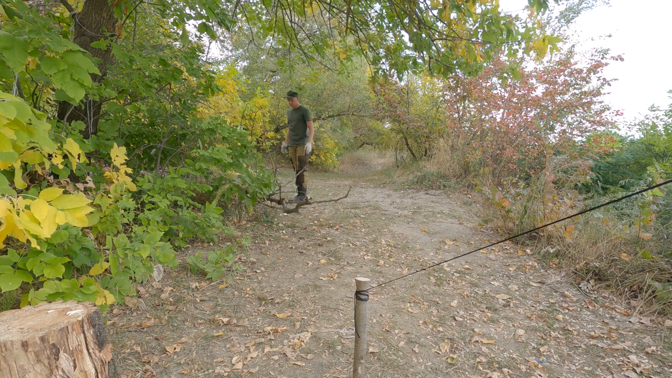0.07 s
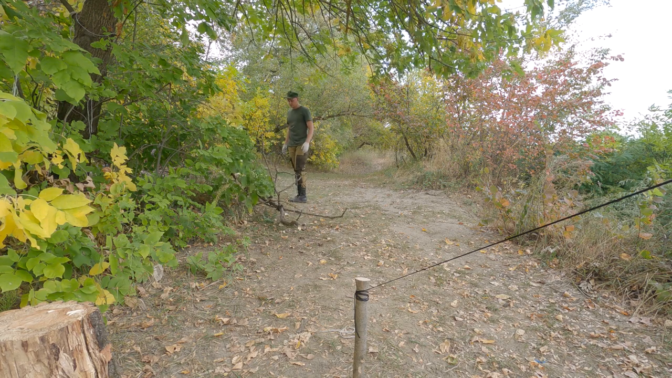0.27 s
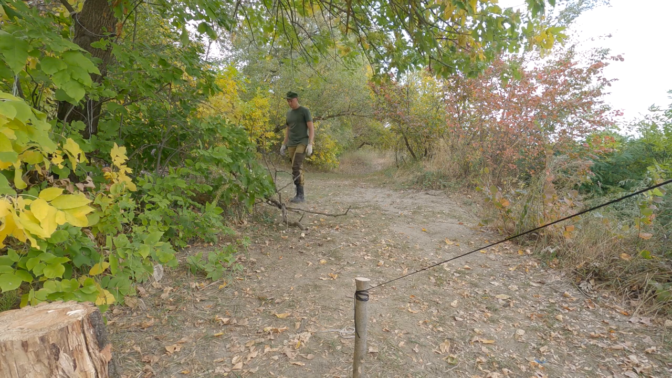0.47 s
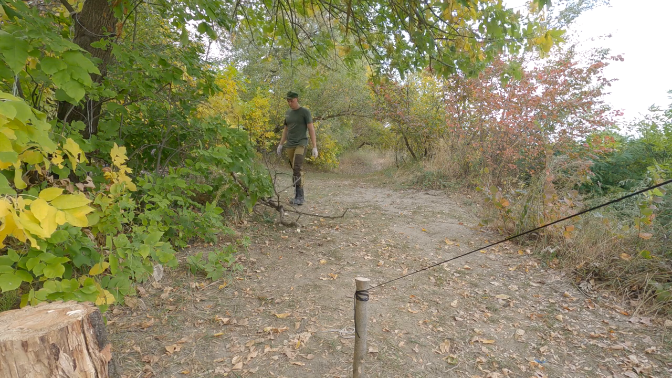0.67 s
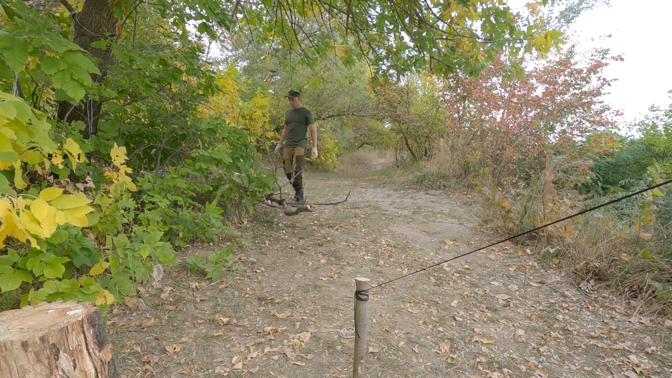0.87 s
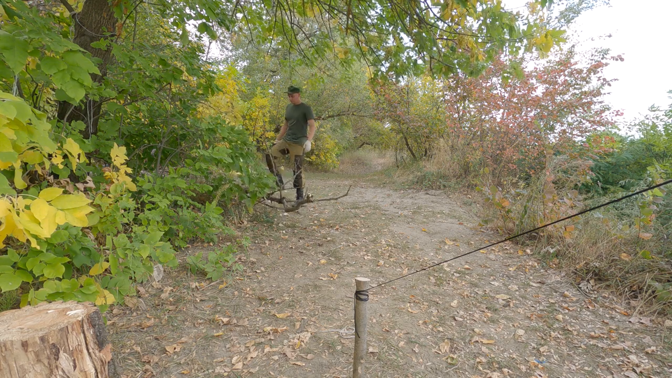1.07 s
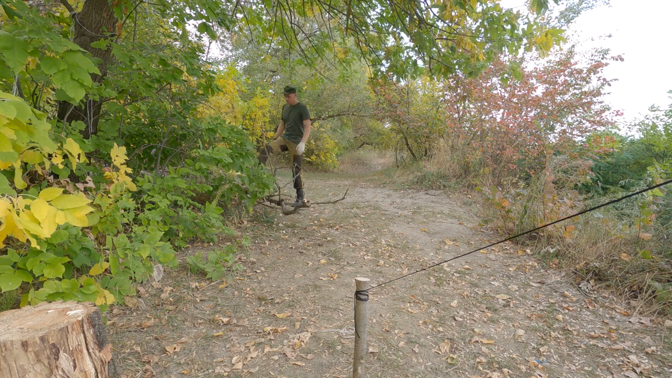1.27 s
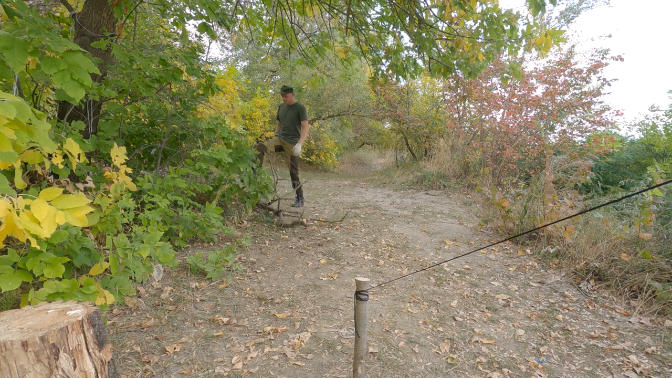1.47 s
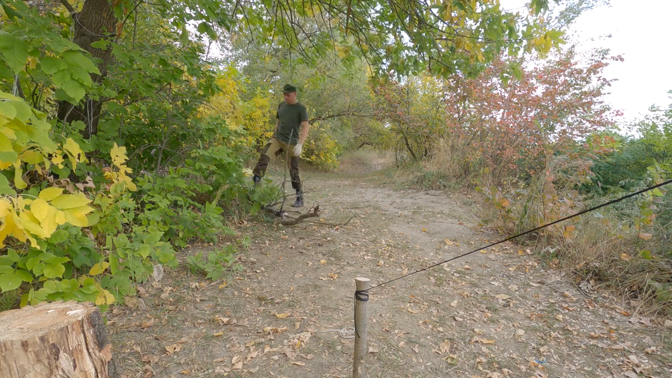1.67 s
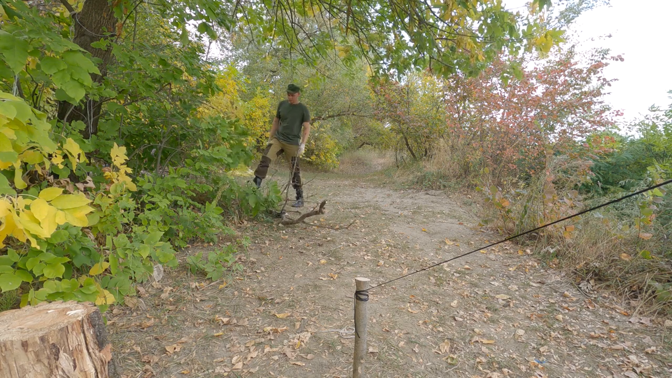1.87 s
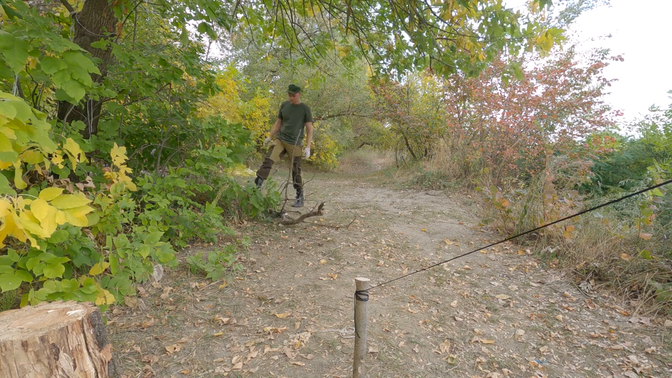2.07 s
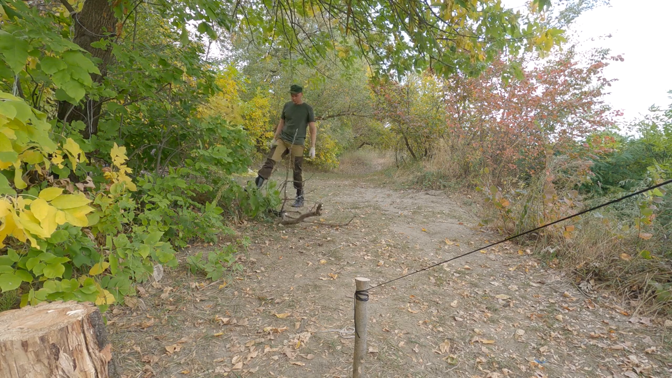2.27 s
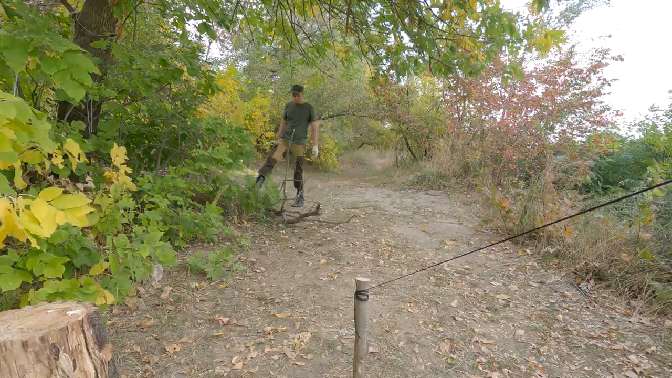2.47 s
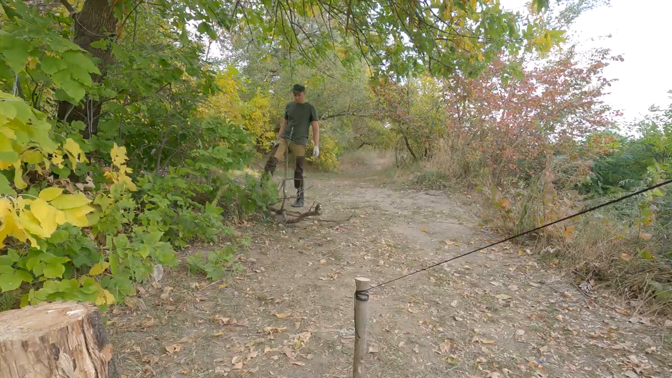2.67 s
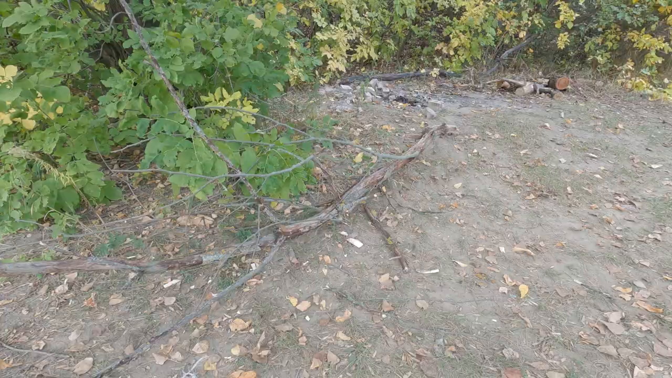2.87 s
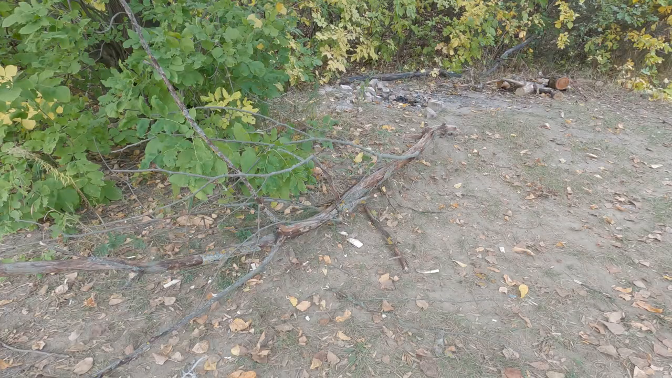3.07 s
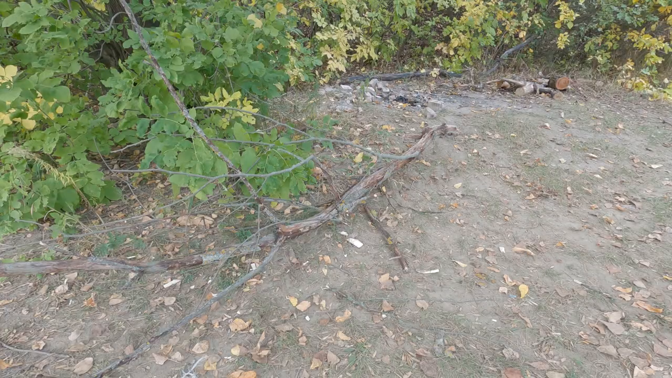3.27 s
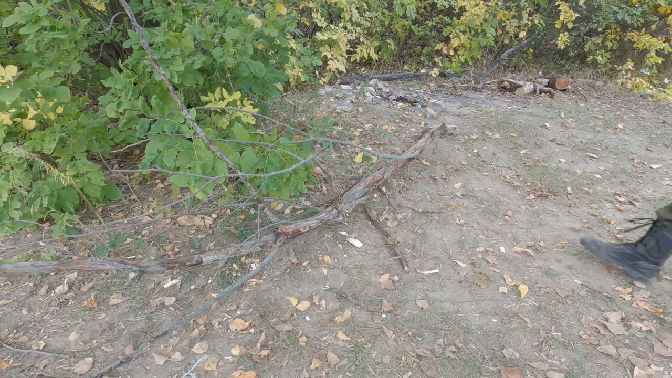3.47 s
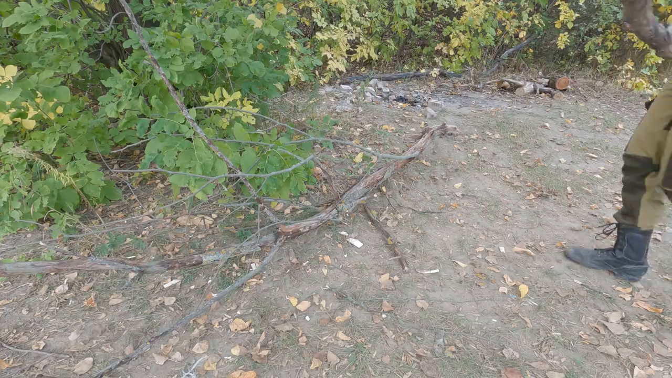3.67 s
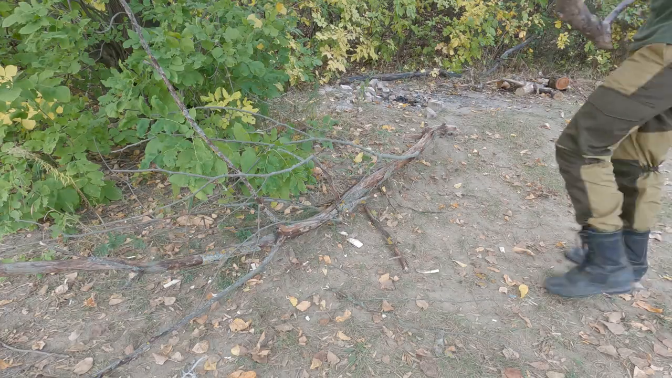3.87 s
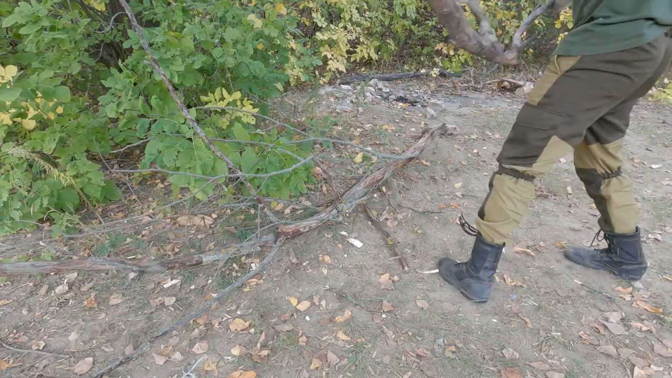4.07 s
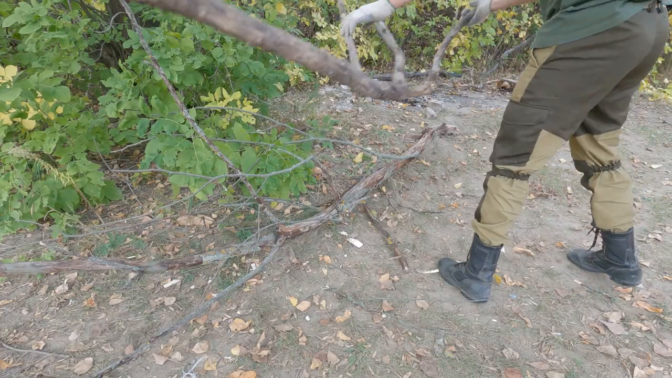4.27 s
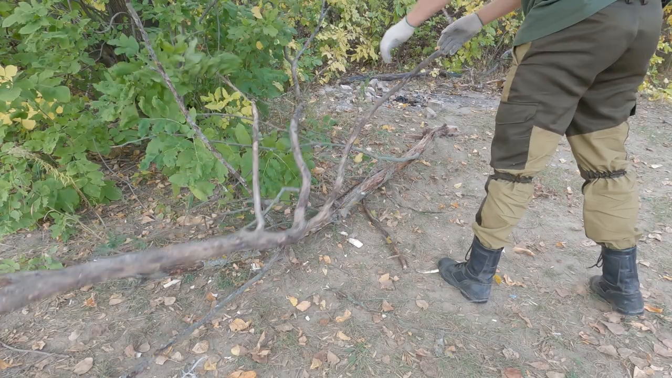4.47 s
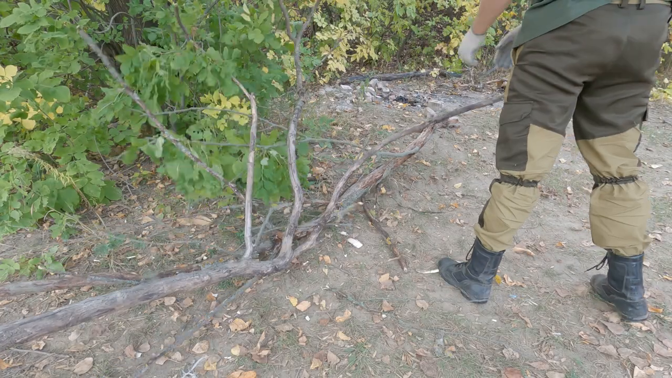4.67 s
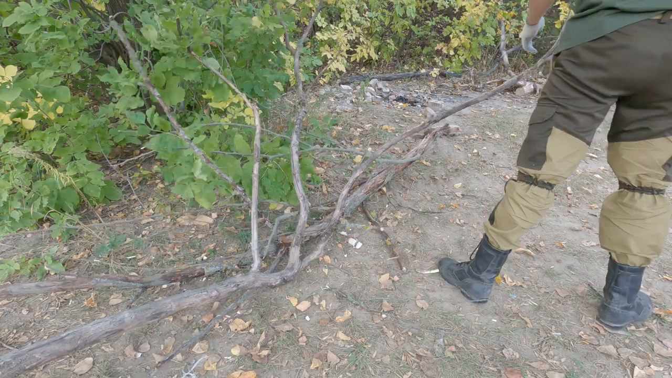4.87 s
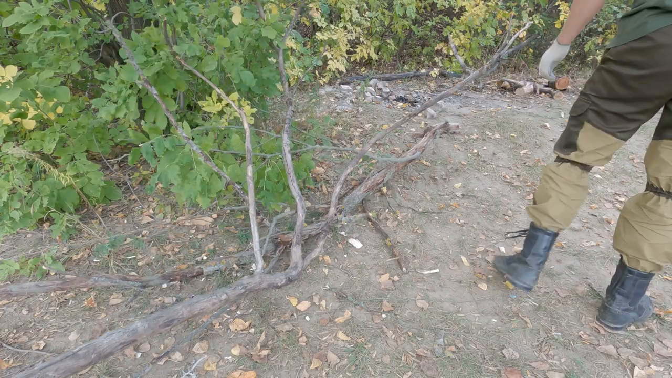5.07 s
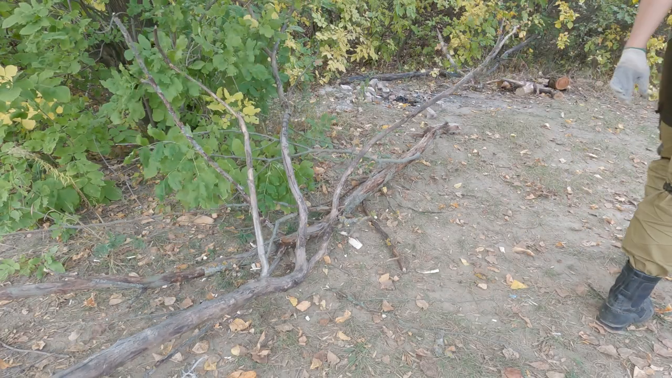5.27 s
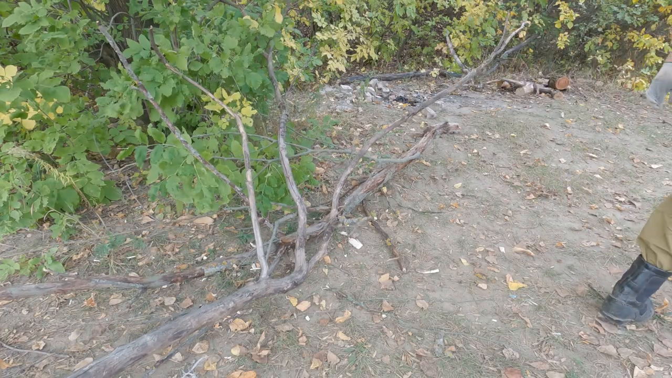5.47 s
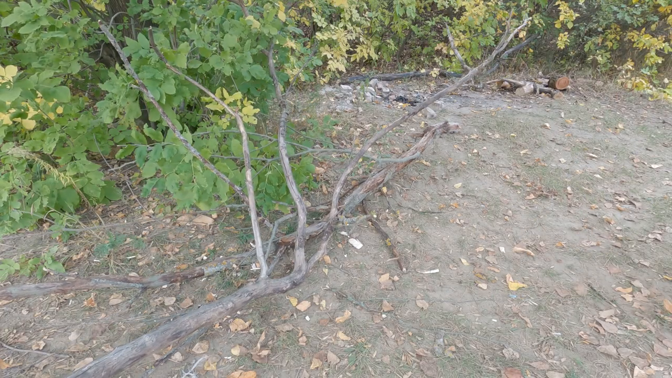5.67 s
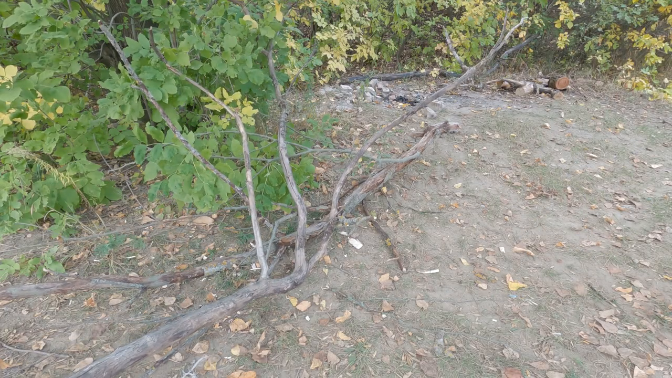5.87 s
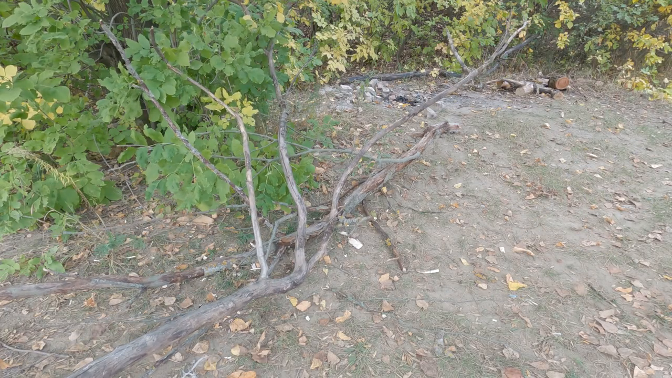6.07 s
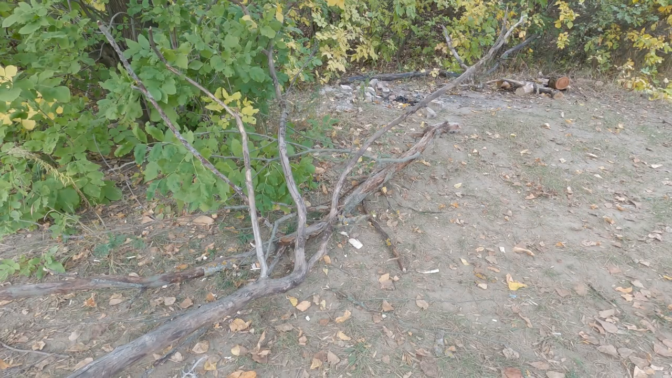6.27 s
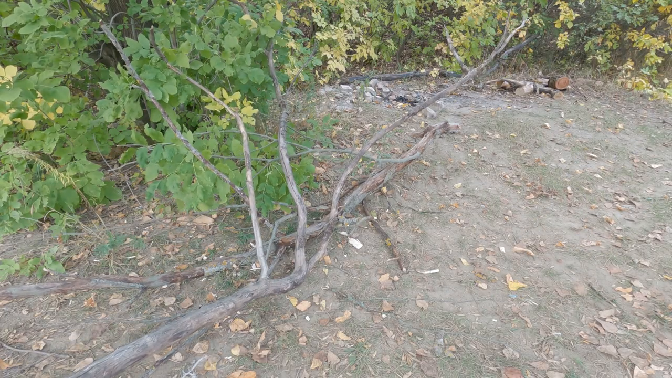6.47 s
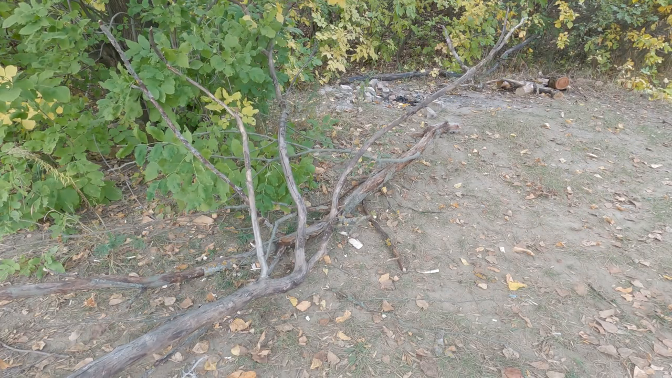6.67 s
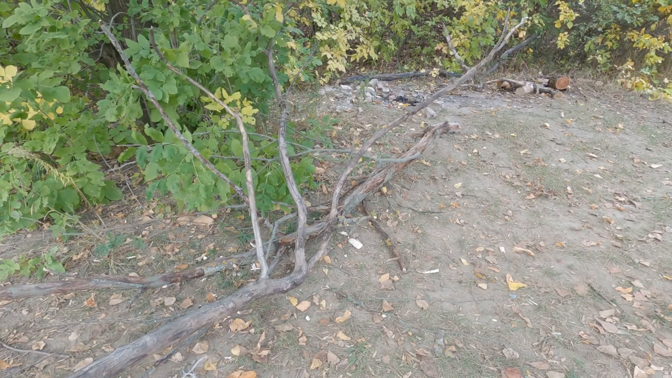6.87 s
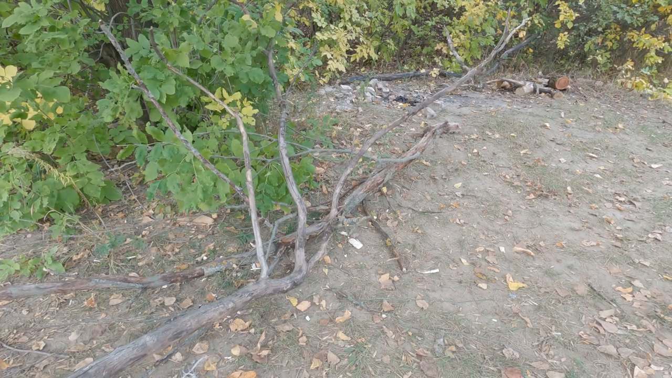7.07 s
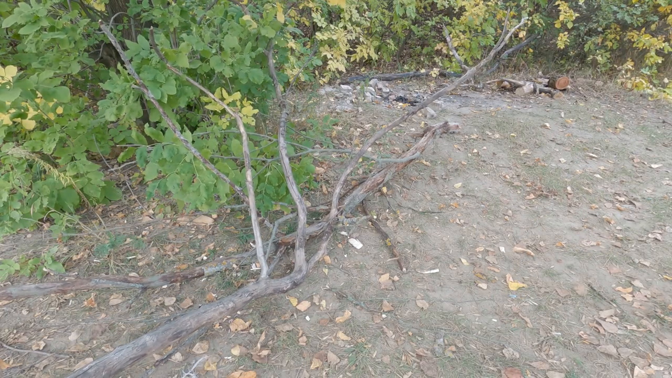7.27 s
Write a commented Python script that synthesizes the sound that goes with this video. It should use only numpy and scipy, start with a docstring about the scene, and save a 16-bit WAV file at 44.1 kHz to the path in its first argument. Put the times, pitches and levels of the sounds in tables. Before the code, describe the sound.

A dead branch is dragged through dry leaves, tears free with sharp snaps, then after footsteps is thrown down with a clattering crash.

```python
"""Dead branch dragged and thrown

In undergrowth a dead branch is dragged over fallen leaves: crackling, coloured noise swelling with the pull,
over dull limb drumming. Twigs snap as noise bursts, boughs knock as ringing modes, heels thud as damped pushes.
Soles crunch grit; the branch is thrown down with a crash and the leaves settle.
All sources are straight ahead of the microphone; the trees answer faintly, as a short scattered noise tail.
A distant rumble, a hush and fluttering insect tones lie underneath.
"""
import sys
import numpy as np
from scipy import signal
from scipy.fft import rfft, irfft, next_fast_len
from scipy.io import wavfile
from scipy.ndimage import uniform_filter1d, map_coordinates

SR = 44100
rng = np.random.default_rng(int(sys.argv[2]) if len(sys.argv) > 2 else 0)


def wav_out(sig):
    """Save sig, one row per channel (or a flat mono array), as 16-bit PCM at SR to the path in sys.argv[1]."""
    wavfile.write(sys.argv[1], SR, np.round(np.clip(np.atleast_2d(sig).T, -1, 1) * 32767).astype(np.int16))


N = 321930  # samples
TOP_HZ = 15850  # upper band limit

# Spectra of the materials: [f/Hz, relative level/dB per Hz]
LEAF_SPECTRUM = [(300, -36.5), (1200, -10), (2600, -4.5), (4500, -3), (6500, -6), (8200, -6.5), (9600, -19),
                 (12000, -23), (15500, -39)]
TWIG_SPECTRUM = [(50, -33.5), (120, -15.5), (250, -2), (480, 0), (730, 0), (1000, -3.5), (1500, 1),
                 (2300, -1), (3500, -4), (7000, -22), (15000, -49)]
FOLIAGE_SPECTRUM = [(500, -41), (2000, -17.5), (3300, -6.5), (4400, -1.5), (6200, -0.5), (8200, -1.5),
                    (9600, -12.5), (12000, -21), (15500, -27.5)]
GRIT_SPECTRUM = [(100, -14), (300, -8.5), (620, -4.5), (950, -6.5), (2000, -2), (3500, 1), (5500, -2.5),
                 (8200, -3.5), (9600, -12.5), (12000, -17), (15500, -29.5)]
CRACK_SPECTRUM = [(100, -14.5), (400, -3.5), (1500, -3.5), (5500, -4), (8200, -3), (9600, -13.5),
                  (12000, -13.5), (15500, -26.5)]
LIMB_SPECTRUM = [(40, -45), (110, -23), (140, -11), (175, 3), (250, 0.5), (400, -7), (900, -35)]
SOIL_SPECTRUM = [(20, -25), (55, 0), (110, -1), (160, -8.5), (300, -26), (1000, -61)]
AIR_SPECTRUM = [(20, -15.5), (60, -6.5), (120, -23), (170, -3), (250, -8), (340, -13), (450, -16.5),
                (900, -26.5), (1500, -17.5), (3000, -22.5), (5000, -23), (7800, -21.5), (9800, -33.5),
                (15500, -51.5)]
TICK_SPECTRUM = [(300, -22.0), (1200, -3.0), (2500, 2.0), (5500, -5.0), (8200, -11.0),
                 (10000, -23), (15500, -34.0)]

# Distant insect song: [t/s, level/dB, f/Hz]
INSECT_SONG = [(0, -85, 3500), (2.9, -85, 3486), (3.401, -77, 3790), (4.2, -80, 3770), (6.701, -84.5, 3340),
               (7, -81, 3420), (7.3, -82.5, 3510)]
# How hard the branch is pulled, as the level of its scraping: [t/s, level/dB]
PULL_LEVEL = [(0.0, -50.5), (0.16, -51), (0.69, -58), (1.38, -60), (1.51, -44), (1.64, -40), (1.69, -37.5),
              (1.76, -34.5), (1.97, -47), (2.65, -64.5), (2.8, -68.5)]
PULL_LEAF_DB, PULL_TWIG_DB, PULL_LIMB_DB = -0.5, -5, -18  # each part's answer to the pull
# The crown catches or rocks and stirs the litter: [peak t/s, leaf level/dB, twig level/dB, t60/s]
LITTER_RUSTLES = [(.03, -55, -57.5, 0.35), (.18, -48.5, -55.5, 0.54), (.465, -58, -61, 0.38),
                  (0.748, -53, -67, 0.1), (.89, -53, -68, 0.32), (1.11, -57.5, -60, 0.18),
                  (1.289, -57, -76, 0.19), (1.495, -42.5, -47.5, 0.23), (2.249, -52.5, -48.5, 0.12),
                  (2.57, -61.5, -72, 0.36), (2.78, -66, -76, .15), (4.329, -55, -56, .6),
                  (4.42, -59.5, -63.5, 0.22), (5.17, -46, -40.5, 0.3), (5.3, -50.5, -52, 0.43),
                  (5.48, -63.5, -59.5, 0.53), (5.66, -53, -54.5, 0.15)]
# Foliage whipping past as the branch tears free: [peak t/s, level/dB, t60/s]
FOLIAGE_WHIPS = [(1.593, -27.5, 0.38), (1.688, -23.5, 0.48), (1.8, -30, 0.18)]
# The heavy limb bumping on the soil: [peak t/s, level/dB, t60/s]
LIMB_BUMPS = [(.06, -66.5, 0.65), (1.431, -58, 0.7), (1.69, -48.5, 0.26), (1.809, -46.5, 0.43),
              (4.64, -33.5, 0.6), (4.86, -51.5, 0.66), (5.15, -50.5, 0.5), (5.27, -51.5, .5),
              (5.49, -60.5, 2), (5.81, -63, 0.24)]
RUSTLE_RISE_S, WHIP_RISE_S, BUMP_RISE_S = 0.01, 0.012, 0.012  # time to rise by the last 10 dB
# Breaking and clacking twigs: [t/s, level/dB, f/Hz, splintering t60/s]
TWIG_SNAPS = [(.016, -41, 3810, 0.047), (.197, -38, 3700, 0.022), (.237, -37, 4380, .023),
              (.444, -45, 3500, .048), (.462, -42, 2800, .1), (.868, -37, 2910, .086),
              (.915, -39.5, 3700, .034), (1.26, -37.5, 4104, .026), (1.508, -39, 3470, 0.11),
              (1.583, -15, 4400, .025), (1.591, -24.5, 5490, .029), (1.641, -23, 5160, .03),
              (1.672, -24, 5140, .12), (1.6851, -15, 3620, 0.017), (1.764, -24.5, 4300, .047),
              (1.781, -21.5, 3920, 0.022), (1.791, -21.5, 4460, .038), (1.821, -25.5, 3570, .1),
              (2.09, -32, 4450, .077), (2.235, -42, 3770, .15), (2.331, -46, 4020, 0.14),
              (2.414, -43, 4460, .12), (2.847, -58.5, 7550, .071), (3.406, -50, 2300, .04),
              (3.498, -54, 7500, 0.049), (3.761, -53, 8000, .045), (3.8686, -45.5, 3485, 0.029),
              (3.9999, -28, 3986, .003), (4.008, -42, 5020, 0.15), (4.038, -35.5, 3700, 0.012),
              (4.052, -38.5, 4470, .13), (4.452, -42.5, 3060, 0.087), (4.498, -24.5, 3300, .043),
              (4.531, -18, 2510, 0.091), (4.568, -11, 3630, 0.03), (4.579, -21.5, 2600, .04),
              (4.601, -18, 3614, 0.059), (4.617, -24.5, 1466, .068), (4.6243, -8.5, 3836, .017),
              (4.739, -25.5, 2010, 0.088), (4.787, -29, 1800, .05), (4.848, -32, 1790, 0.03),
              (5.116, -41, 3000, .073), (5.136, -36, 1890, 0.19), (5.245, -34.5, 1600, .056),
              (5.321, -36, 3200, .04), (5.562, -42, 6460, 0.033), (6.089, -45, 2600, .11),
              (6.329, -55, 2600, .06), (6.427, -55.5, 6000, 0.082), (6.68, -35, 14030, .012),
              (6.6802, -39, 2400, .1)]
# Decay of the scattered tail among the trees: [f/Hz, t60/s]
TREE_DECAY = [(150, 0.78), (1000, 0.38), (4000, 0.51), (12000, 0.73)]
# Heels and wood landing on packed soil: [t/s, push peak level/dB, f/Hz, half the crumble t60/s]
SOIL_THUDS = [(1.029, -56.5, 60, .076), (1.408, -46.5, 150, .08), (1.6857, -25.5, 379, .018),
              (1.784, -49, 80, 0.093), (3.137, -37, 90, .11), (3.1507, -19.5, 185, .008),
              (3.1483, -29.5, 847, 0.0063), (3.592, -40.5, 166, .085), (3.621, -44, 110, .08),
              (4.001, -34.5, 600, .003), (4.085, -37.5, 121, .067), (4.107, -33, 430, .038),
              (4.121, -33, 430, .04), (4.628, -29, 175, .09), (6.109, -40.5, 150, .11),
              (6.618, -52.5, 170, .084), (6.686, -48.5, 150, 0.11), (7.204, -52, 165, .1),
              (7.277, -50, 220, .036)]
# Thick boughs knocking: [t/s, level/dB, lowest mode f/Hz, lowest mode t60/s]
BOUGH_KNOCKS = [(1.106, -39.5, 2710, .03), (1.582, -16, 1486, 0.026), (1.685, -22.5, 717, 0.03),
                (1.708, -29, 717, 0.095), (1.79, -29.5, 740, 0.037), (1.822, -26, 1136, 0.018),
                (3.403, -42, 1050, 0.014), (4.333, -45.5, 1946, 0.071), (4.5, -30.5, 1064, 0.068),
                (4.519, -25, 1041, 0.024), (4.5365, -13, 1582, 0.042), (4.578, -17.5, 2303, 0.026),
                (4.583, -19.5, 1052, 0.046), (4.615, -16.5, 1047, 0.042), (4.743, -29.5, 1528, 0.031),
                (4.789, -27.5, 1221, 0.027), (5.137, -28.5, 1678, .06), (5.151, -34, 640, 0.05),
                (5.248, -36, 784, 0.046), (5.283, -39.5, 621, 0.026), (5.47, -50.5, 1361, 0.13),
                (5.67, -49.5, 1470, .05), (5.797, -52.5, 1340, 0.051), (5.803, -51.5, 473, .06)]
# Bending modes of a bough: [multiple of the lowest f, mean level/dB]
BOUGH_MODES = [(1, -1.5), (1.17, -8.5), (1.46, -16), (2.2, -15), (2.761, -8), (3.9, -21.5)]
# Soles crushing grit and leaves: [peak t/s, level/dB, rise of the last 10 dB/s, t60/s]
SOLE_CRUNCHES = [(3.09, -27.5, 0.0068, 0.18), (3.53, -54.5, 0.003, 0.17), (3.549, -54.5, .006, 0.06),
                 (3.577, -46.5, 0.003, 0.052), (3.597, -36, 0.018, 0.16), (3.739, -61.5, 0.0074, 0.82),
                 (4.005, -48.5, 0.013, 0.16), (4.086, -33.5, 0.013, 0.16), (4.108, -35.5, .015, 0.078),
                 (6.12, -61.5, .01, 0.68), (6.333, -53.5, 0.0055, 0.24), (6.618, -59.5, 0.014, 0.16),
                 (6.69, -49, 0.022, 0.13), (7.279, -62.5, 0.037, 0.33)]
# The thrown branch: its crown meets the bush, ever more ploughs in until it lands, then the litter settles
TOUCH_S, LAND_S, PLOUGH_POWER = 4.44, 4.613, 1.5
CRASH_T60_S = 0.18
LEAF_CRASH_DB, LEAF_SETTLE_DB, LEAF_SETTLE_T60_S = -27, -36, 3.06
TWIG_CRASH_DB, TWIG_SETTLE_DB, TWIG_SETTLE_T60_S = -36, -34, 2.15


def amp(db):
    """Decibels to gain."""
    return 10 ** (np.asarray(db) / 20)


def unit(x):
    """Scale to rms 1."""
    return x / np.sqrt(np.mean(x ** 2) + 1e-20)


def along(points, hz):
    """(Hz, value) points read on a log axis."""
    f, v = np.transpose(points)
    return np.interp(np.log(hz + 1), np.log(f + 1), v)


def levels(rows):
    """One gain per sample for each dB column, -120 dB outside the rows."""
    s, *columns = np.transpose(rows)
    t = np.arange(N) / SR
    return [amp(np.interp(t, s, column, left=-120, right=-120)) for column in columns]


def swells(rows):
    """Summed gain of (peak s, dB, rise s, t60 s) rows: each rises to its peak and dies away."""
    s, db, rise, t60 = np.array(list(rows)).T[:, :, None]
    clock = np.arange(0, N, 22) / SR
    t = clock - s
    slope_db = np.minimum(20 * t / (2 * rise), -60 * t / t60).clip(-200, 0)
    gain = amp(db + slope_db).sum(axis=0)
    return np.interp(np.arange(N) / SR, clock, gain)


def coloured(x, gain_db):
    """Causal minimum-phase filter whose gain in dB is a function of frequency."""
    m = 2 * next_fast_len(x.shape[-1] // 2 + 2048)
    cepstrum = irfft(np.log(amp(gain_db(np.fft.rfftfreq(m, 1 / SR)))))
    # folding the cepstrum forward in time makes the filter causal
    cepstrum[1:m // 2] *= 2
    cepstrum[m // 2 + 1:] = 0
    response = np.exp(rfft(cepstrum))
    return irfft(rfft(x, m) * response, m)[..., :x.shape[-1]]


def shaped(x, spectrum):
    """x with the given spectrum, at rms 1."""
    return unit(coloured(x, lambda hz: along(spectrum, hz)))


def add(track, s, sound):
    """Mix a sound into a track at time s."""
    i = max(0, round(s * SR))
    track[i:i + len(sound)] += sound[:N - i]


def crackle(size, rate, spread_db, life, hiss):
    """Tiny brittle fractures: damped rings of any pitch and uneven strength over a smooth hiss.

    rate is in fractures per second, life is the middle decay time in s."""
    bed = rng.standard_normal(size)
    draws = rng.random((int(rate * size / SR) + 1, 4))
    when, pitch, force, length = draws.T[:, :, None]
    k = np.arange(160)  # samples into a ring
    decay = life * SR * 10 ** (length - .5)
    strength = amp(-spread_db * np.log(np.maximum(force, .01))) / np.sqrt(decay)
    rings = strength * np.exp(-k / decay) * np.cos(2 * np.pi * pitch * TOP_HZ * k / SR)
    places = (when * size).astype(int) + k
    grains = np.bincount(places.ravel(), rings.ravel(), minlength=size)[:size]
    return unit(unit(grains) + hiss * bed)


def clumps(rate, depth_db):
    """Gain of twigs catching and letting go, rate times a second."""
    knots = rng.standard_normal(int(N * rate / SR) + 4)
    drift = map_coordinates(knots, [np.arange(N) * rate / SR])
    return unit(amp(depth_db * drift))


def patchy(x, depth_db):
    """Ever new twigs and leaves sound, each stressing its own pitches for a few hundredths of a second."""
    z = signal.stft(x, nperseg=512)[2]
    field = uniform_filter1d(rng.standard_normal(z.shape), size=3, axis=0)  # across pitch
    field = uniform_filter1d(field, size=6, axis=1)  # across time
    stressed = signal.istft(z * amp(depth_db * unit(field)), nperseg=512)[1]
    return unit(stressed[:N])


def contacts(rate, spread_db):
    """Sparse, pitched ticks of thin twigs striking one another."""
    return shaped(crackle(N, rate, spread_db, life=0.00068, hiss=0.15), TICK_SPECTRUM)


def forest_air(band_hz=150):
    """A distant rumble and hush, and drifting insect tones whose strength flutters at random."""
    s, db, hz = np.transpose(INSECT_SONG)
    t = np.arange(N) / SR
    lowpass = lambda f: -10 * np.log10(1 + (f / band_hz) ** 4)
    flutter = unit(coloured(rng.standard_normal(N), lowpass))
    tone = np.sin(2 * np.pi * np.cumsum(np.interp(t, s, hz)) / SR)
    song = unit(flutter * tone)
    hush = shaped(rng.standard_normal(N), AIR_SPECTRUM)
    return amp(-69.5) * hush + amp(np.interp(t, s, db)) * song


def dragging():
    """The branch rakes dry leaves and twigs; both follow the pull, and stiff twigs catch and slip in jerks."""
    pull, = levels(PULL_LEVEL)
    leaf_rustle = swells((s, db, RUSTLE_RISE_S, t60) for s, db, _, t60 in LITTER_RUSTLES)
    twig_rustle = swells((s, db, RUSTLE_RISE_S, t60) for s, _, db, t60 in LITTER_RUSTLES)
    leaf = amp(PULL_LEAF_DB) * pull + leaf_rustle
    twig = amp(PULL_TWIG_DB) * pull * clumps(rate=32, depth_db=3.0) + twig_rustle
    whip = swells((s, db, WHIP_RISE_S, t60) for s, db, t60 in FOLIAGE_WHIPS)

    leaves = shaped(crackle(N, rate=4000, spread_db=-1.0, life=0.00019, hiss=1.0), LEAF_SPECTRUM)
    twigs = shaped(crackle(N, rate=3000, spread_db=2.5, life=0.001, hiss=.9), TWIG_SPECTRUM)
    swish = shaped(crackle(N, rate=5600, spread_db=1.5, life=0.00018, hiss=0.87), FOLIAGE_SPECTRUM)
    leaves = patchy(leaves, depth_db=2.5) + amp(-12) * contacts(rate=370, spread_db=4.5)
    twigs = patchy(twigs, depth_db=3)
    swish = patchy(swish, depth_db=3.0)
    return clumps(rate=81, depth_db=1) * (leaf * leaves + twig * twigs + whip * swish)


def shudder(ground_db=-44, ground_rise=0.033, ground_t60=0.93, ground_lag=0.052):
    """The thick limb drums dully as it is pulled and at each bump; its landing also shakes the soil."""
    bumps = swells((s, db, BUMP_RISE_S, t60) for s, db, t60 in LIMB_BUMPS)
    limb = amp(PULL_LIMB_DB) * levels(PULL_LEVEL)[0] + bumps
    landing = swells([(LAND_S + ground_lag, ground_db, ground_rise, ground_t60)])
    ground = landing + amp(-27.5) * limb
    drumming = limb * shaped(rng.standard_normal(N), LIMB_SPECTRUM)
    return drumming + ground * shaped(rng.standard_normal(N), SOIL_SPECTRUM)


def snaps(width=0.78, ring_db=6.0, splinter_db=-8, crack_t60=0.0035):
    """Each twig gives a sharp crack and a run of splinters, coloured by its own wood resonances."""
    out, t = np.zeros(N), np.arange(SR // 6) / SR
    for s, db, hz, t60 in TWIG_SNAPS:
        crack = rng.choice([-1, 1], len(t)) * amp(-60 * t / crack_t60)
        splinters = crackle(len(t), rate=4500, spread_db=3.0, life=0.00018, hiss=0.65)
        splinters = splinters * amp(splinter_db - 60 * t / t60)
        wood = np.column_stack([np.geomspace(300, 12000, num=44), ring_db * rng.standard_normal(44)])

        def colour_db(f):
            """A broad hump about the twig's pitch, falling faster above it, plus its resonances."""
            octaves = np.log2((f + 1) / hz)
            hump = -10 * np.log10(1 + (octaves / width) ** 2) - 2.5 * np.maximum(octaves, 0)
            return along(CRACK_SPECTRUM, f) + along(wood, f) + hump

        snap = coloured(crack + splinters, colour_db)
        loudest = uniform_filter1d(snap ** 2, size=66).max()  # power over 1.5 ms
        add(out, s, amp(db) * snap / np.sqrt(loudest))
    return out


def trees(x):
    """Trunks and foliage scatter a faint, short tail."""
    hz, t, z = signal.stft(rng.standard_normal(SR * 3 // 4), SR, nperseg=256)
    decay = amp(-60 * t / along(TREE_DECAY, hz)[:, None])
    tail = signal.istft(z * decay, SR, nperseg=256)[1]
    delayed = np.pad(tail / np.linalg.norm(tail), (300, 0))  # 300 samples, about 7 ms
    return signal.fftconvolve(x, delayed)[:N]


def heels():
    """A heel or wood gives the soil one short, heavily damped push, with crumbling earth around it."""
    out, t = np.zeros(N), np.arange(SR // 4) / SR
    for s, db, hz, t60 in SOIL_THUDS:
        cycles = hz * t
        onset = 1 - np.exp(-2 * cycles)
        dent = np.sin(2 * np.pi * cycles) * amp(-24 * cycles) * onset ** 2
        push = -np.gradient(dent)  # the air follows the speed of the soil
        band = lambda f: -10 * np.log10(1 + (f / (2 * hz)) ** 4 + (.5 * hz / (f + 1)) ** 4)
        earth = unit(coloured(rng.standard_normal(len(t)), band))
        crumble = .6 * earth * onset * amp(-60 * t / (2 * t60))
        add(out, s, amp(db) * (push / np.abs(push).max() + crumble))
    return out


def knocks(rough=0.23, attack_s=.0004):
    """A struck bough rings briefly; its higher modes die first, and loose bark roughens the ring."""
    out, t = np.zeros(N), np.arange(SR // 6) / SR
    for s, db, hz, t60 in BOUGH_KNOCKS:
        ring = np.zeros(len(t))
        for k, level in BOUGH_MODES:
            mode_db = level + rng.normal(0, 0.88) - 60 * t * np.sqrt(k) / t60
            ring += amp(mode_db) * np.sin(2 * np.pi * hz * k * t)
        rattle = 1 + rough * unit(uniform_filter1d(rng.standard_normal(len(t)), size=40))
        attack = 1 - np.exp(-t / attack_s)
        add(out, s, amp(db) * ring * rattle * attack)
    return out


def crunches():
    """Grit crackles louder as the weight comes onto a sole, then dies away."""
    weight = swells(SOLE_CRUNCHES)
    grit = shaped(crackle(N, rate=7000, spread_db=4.0, life=0.0002, hiss=0.71), GRIT_SPECTRUM)
    return weight * patchy(grit, depth_db=1.5)


def crash(crash_db, settle_db, settle_t60):
    """Gain that builds until the landing, then drops fast into a long settling."""
    t = np.arange(N) / SR
    plough = np.clip((t - TOUCH_S) / (LAND_S - TOUCH_S), 0, 1) ** PLOUGH_POWER
    since = np.maximum(t - LAND_S, 0)
    burst = amp(crash_db - 60 * since / CRASH_T60_S)
    settling = amp(settle_db - 60 * since / settle_t60)
    return plough * (burst + settling)


def falling():
    """The crown crashes into the litter, which goes on rustling ever more softly."""
    leaf = crash(LEAF_CRASH_DB, LEAF_SETTLE_DB, LEAF_SETTLE_T60_S)
    twig = crash(TWIG_CRASH_DB, TWIG_SETTLE_DB, TWIG_SETTLE_T60_S) * clumps(rate=60, depth_db=1.8)
    leaves = shaped(crackle(N, rate=6200, spread_db=1.0, life=0.0002, hiss=1.0), LEAF_SPECTRUM)
    twigs = shaped(crackle(N, rate=2200, spread_db=0.5, life=0.0013, hiss=1.0), TWIG_SPECTRUM)
    leaves = patchy(leaves, depth_db=1.5) + amp(-11.0) * contacts(rate=320, spread_db=2)
    twigs = patchy(twigs, depth_db=3.5)
    return clumps(rate=57, depth_db=1) * (leaf * leaves + twig * twigs)


def scene():
    """All sources lie straight ahead; only snaps, knocks and crunches are sent into the trees."""
    wood, grit = snaps() + knocks(), crunches()
    echo = trees(amp(-17) * wood + amp(-20) * grit)
    mono = forest_air() + dragging() + shudder() + wood + echo + heels() + grit + falling()
    return np.array([mono, mono])


def record(dry, low_hz=32, wide_db=-1):
    """Thins the deepest bass and stops at TOP_HZ; mono below 12.4 kHz, the treble above it randomly
    spread between the channels."""
    m = next_fast_len(N + SR // 2)
    hz = np.fft.rfftfreq(m, 1 / SR)
    knots = rng.standard_normal(N // 80 + 4)  # one every 80 samples
    spread = unit(np.tanh(2 * map_coordinates(knots, [np.arange(N) / 80])))
    top = irfft(rfft(dry[0], m) * (hz > 12400), m)[:N]
    side = amp(wide_db) * top * spread
    band = (hz < TOP_HZ) * (1j * hz / (low_hz + 1j * hz)) ** 2
    return irfft(rfft(dry + np.array([side, -side]), m) * band, m)[:, :N]


dry = scene()
out = record(dry)
wav_out(out)
```